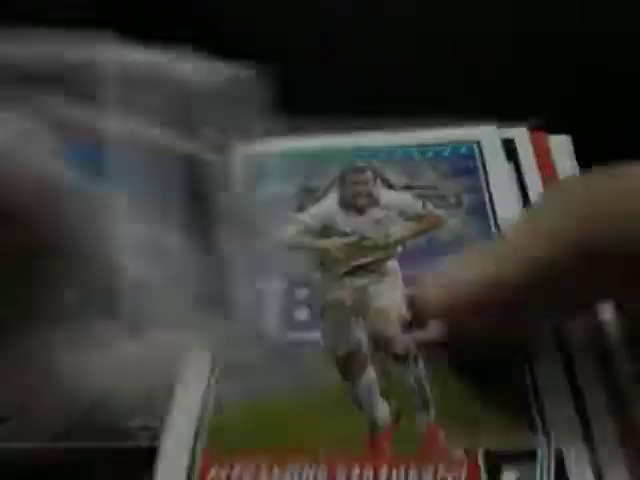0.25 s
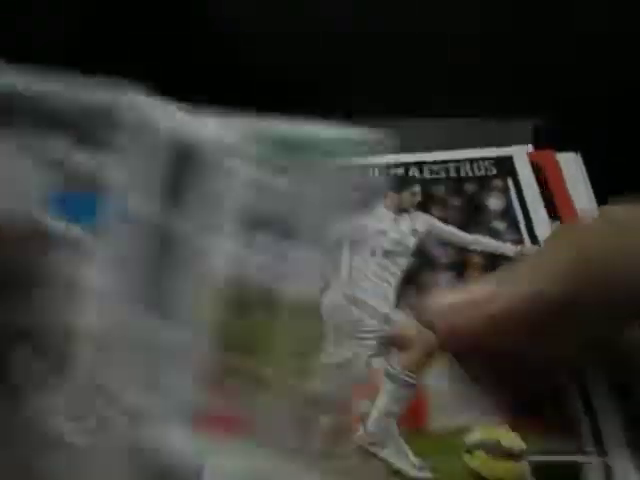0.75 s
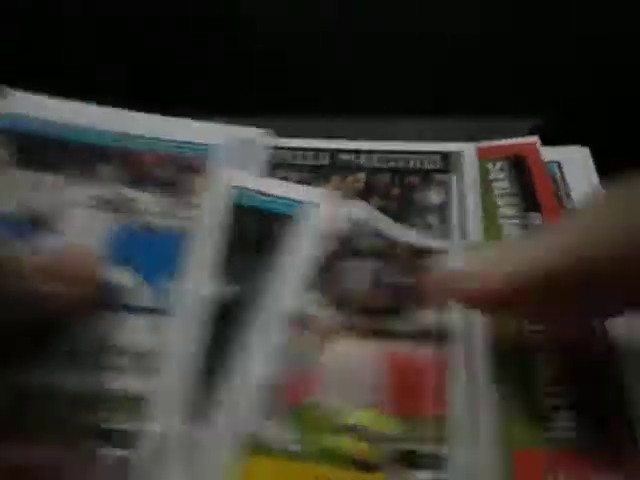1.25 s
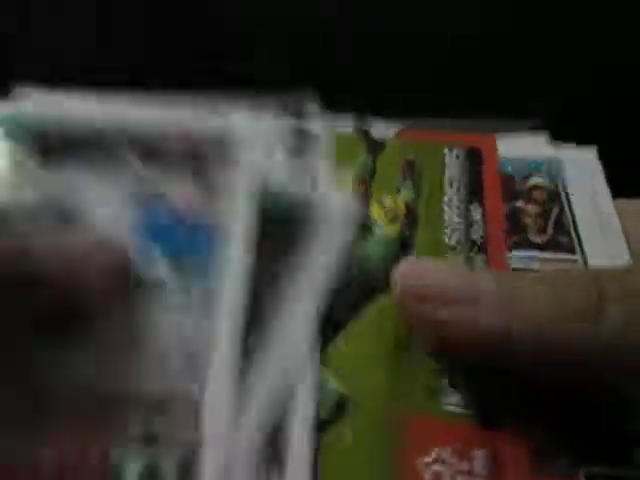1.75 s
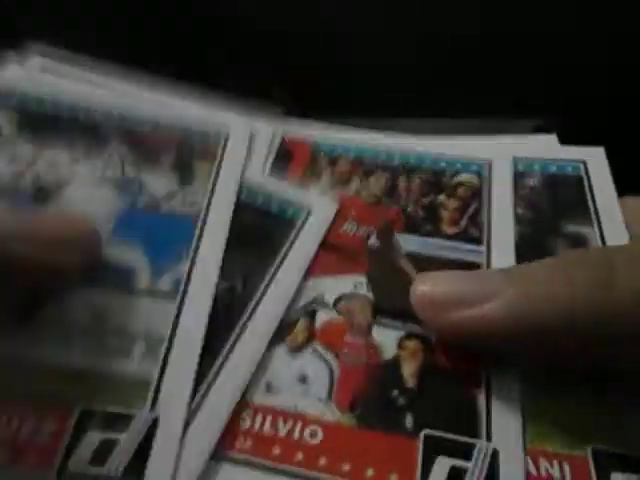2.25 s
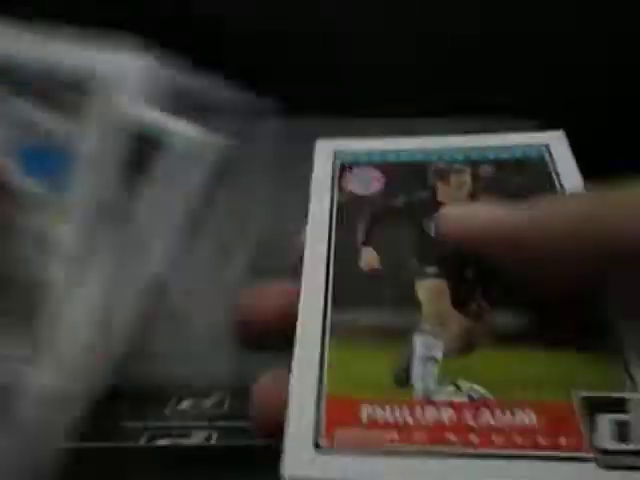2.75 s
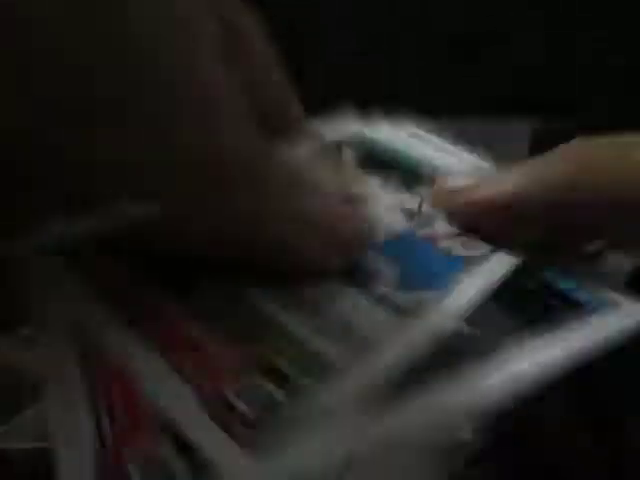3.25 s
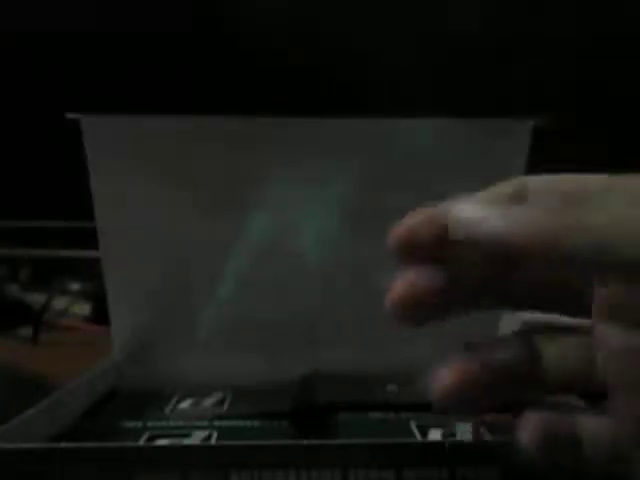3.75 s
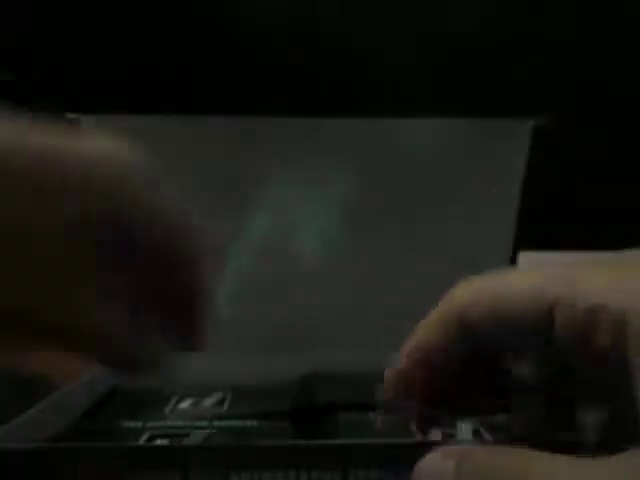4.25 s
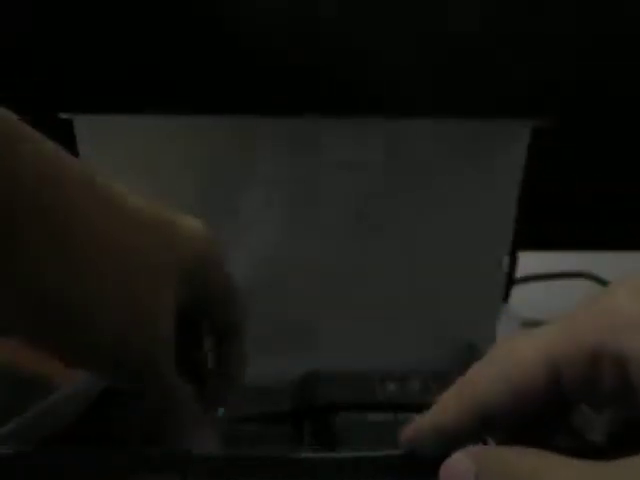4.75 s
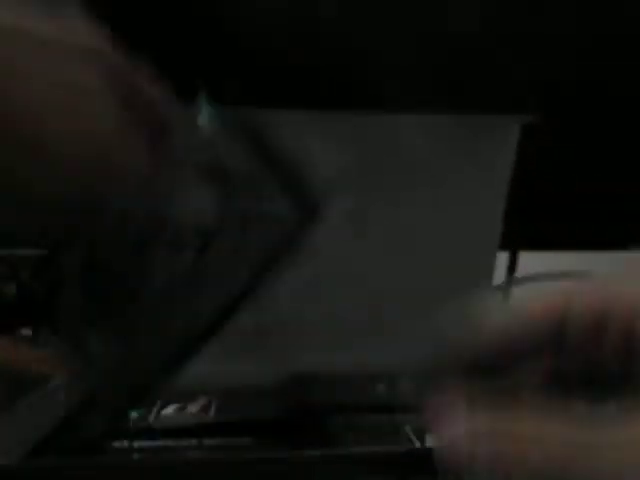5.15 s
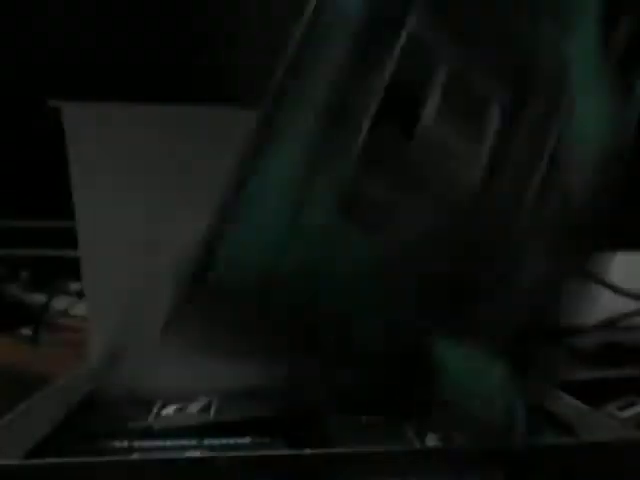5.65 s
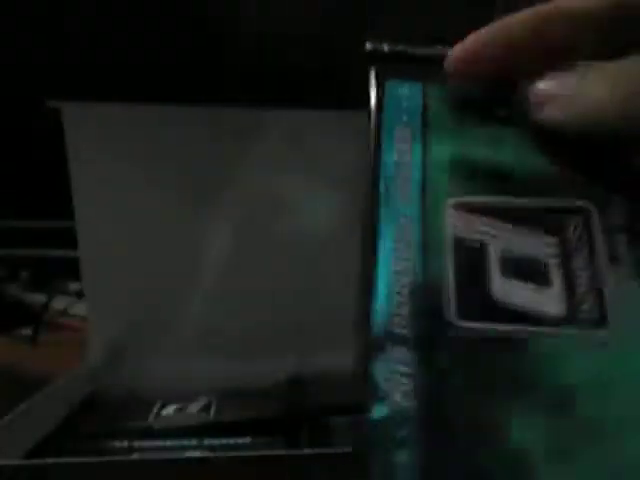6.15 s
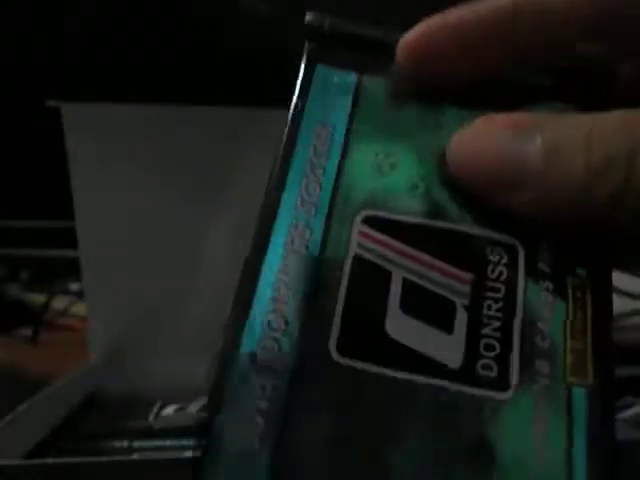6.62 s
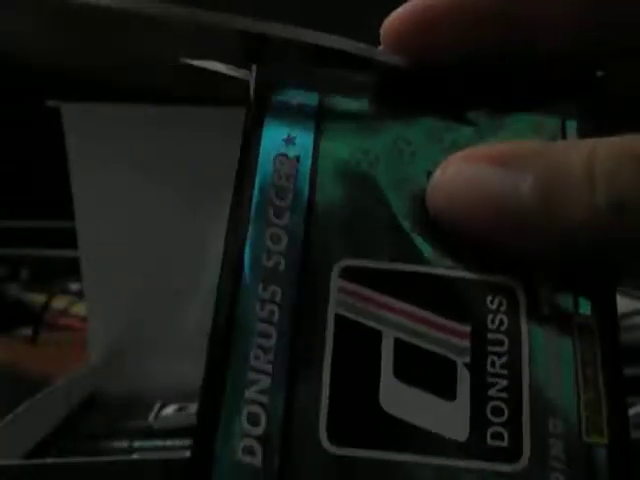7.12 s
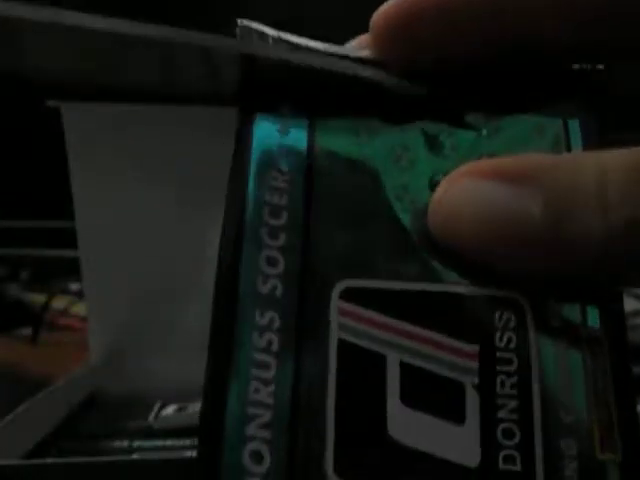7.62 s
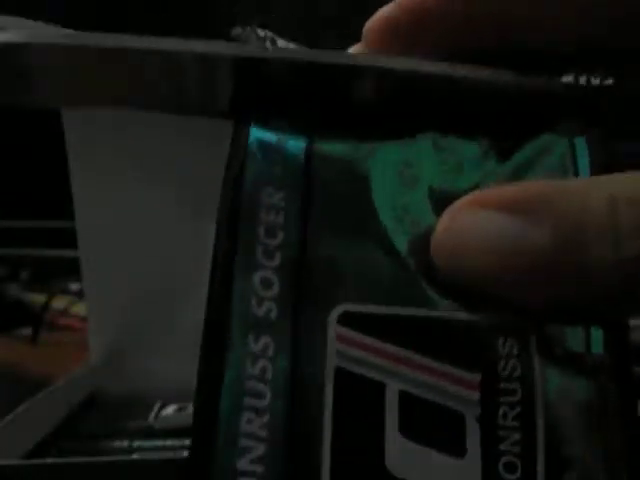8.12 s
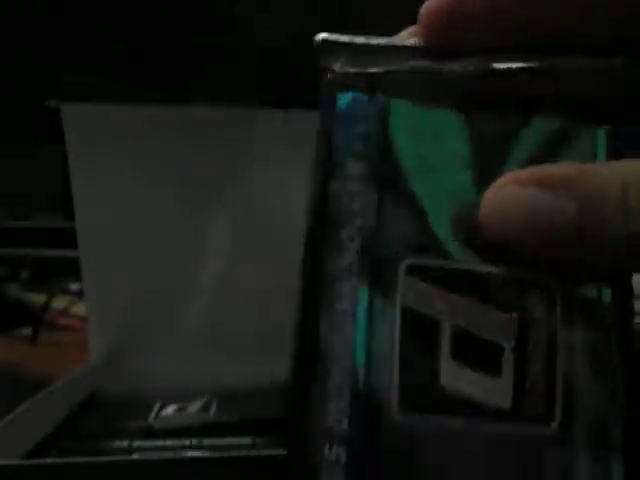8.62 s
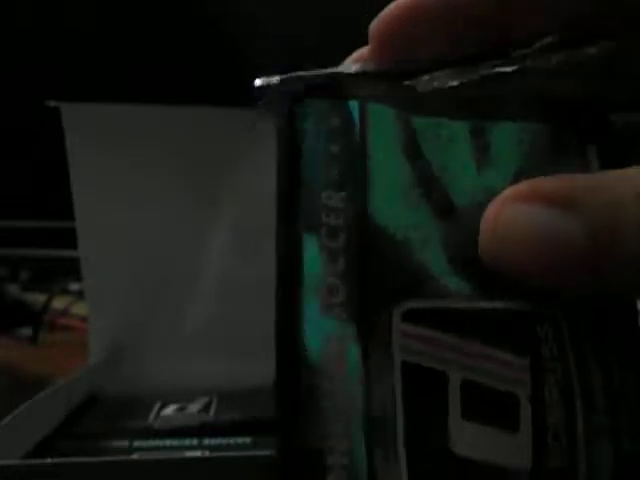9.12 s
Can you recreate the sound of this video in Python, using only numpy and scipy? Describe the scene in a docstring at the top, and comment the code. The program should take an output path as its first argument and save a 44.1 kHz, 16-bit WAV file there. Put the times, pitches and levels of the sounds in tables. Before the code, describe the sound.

Cards snap and rustle in the hands before a foil wrapper crinkles and rips, followed by a few hollow desk knocks in a quiet room.

```python
"""A desk in a quiet room, close to a small microphone, with a fan whirring steadily.
Trading cards are slid and flicked off a stack: friction makes them hiss, and each freed edge snaps.
A foil pack is scraped out of a cardboard box and torn open, crackling as its creases buckle.
A few hollow knocks set the damped modes of the desk ringing."""
import sys
import numpy as np
from scipy import signal
from scipy.io import wavfile
from scipy.ndimage import uniform_filter1d

SR = 44100
rng = np.random.default_rng(int(sys.argv[2]) if len(sys.argv) > 2 else 0)


def to_wav(sig):
    """Store sig (one row per channel, or 1-D mono) as 16-bit WAV at the path in sys.argv[1].

    Samples outside -1..1 are clipped; the rate is SR.
    """
    pcm = np.clip(np.atleast_2d(sig), -1, 1) * 32767
    pcm = np.round(pcm).astype(np.int16)
    wavfile.write(sys.argv[1], SR, pcm.T)  # frames by channels


N = 413658
TAPS = 4096
HZ = np.fft.rfftfreq(TAPS, 1 / SR) + 1
TIME = np.arange(N) / SR
CLICK_GAIN = np.sqrt(.005 * SR)  # brings a click of energy 1 to rms 1 over 5 ms

# Levels in all tables are relative: each source applies its own gains.
# Spectrum of fan and room air. Each row: frequency in Hz, spectral density in dB.
AIR_SPECTRUM = [(18, -47), (32, -12.5), (70, -10), (125, -0.5), (340, -1.5), (500, 1), (930, -5),
                (1460, -10), (2050, -11.5), (2600, -9), (3100, -12.5), (4300, -11.5), (5600, -20),
                (12000, -27)]
# Resonances of the fan's housing. Each row: frequency in Hz, width in Hz, lift in dB.
FAN_RESONANCES = [(1117, 54, 8.5), (2330, 260, 9), (6100, 64, 8.5)]
# Reverberation of the room. Each row: frequency in Hz, time to fall 60 dB in seconds.
ROOM_DECAY = [(150, 0.71), (1000, 0.24), (4000, 0.6), (10000, 0.45)]
# Treble response, falling in three lobes between deep notches. Each row: frequency in Hz, gain in dB.
TREBLE_RESPONSE = [(5700, 0), (6100, -3), (6600, -11), (6850, -20), (7000, -42), (7150, -18), (7600, -8),
                   (8100, -12), (8400, -21), (8520, -42), (8700, -18), (9300, -11), (9800, -18), (10000, -42),
                   (10200, -15), (10550, -6), (11100, -9), (11600, -17), (12000, -40)]

# Hollow resonances of the desk. Each row: frequency in Hz, level in dB, time to fall 60 dB in seconds.
DESK_MODES = [(109, -17, 0.61), (246.4, 1.5, 0.31), (300.6, -1.5, 0.27), (533, 5, 0.15), (609.4, -1, 0.14),
              (790, -0.5, 0.28), (1191, 3, 0.11), (1285, 9, 0.1), (1410, -1, 0.073), (1650, -17, 0.13),
              (1900, 4.5, 0.12), (2097, 3, 0.15), (2652, 8.5, 0.1), (2950, 4, 0.086), (3730, 2, 0.28)]
# Spectrum of a blow on the desk. Each row: frequency in Hz, level in dB.
BLOW_SPECTRUM = [(30, -53), (100, -4), (240, -3), (700, 1), (1400, 1), (2800, 3.5), (4200, 3.5),
                 (6000, -6.5), (12000, -4.5)]
# Knocks on the desk. Each row: start in seconds, blow in dB, treble cutoff in Hz, ringing in dB.
DESK_KNOCKS = [(5.926, -35, 710, -28.5), (5.937, -33, 1580, -35), (6.093, -57, 700, -38),
               (6.162, -42, 1300, -36.5), (9.0148, -21, 3770, -24), (9.042, -26, 3600, -26),
               (9.1085, -17.5, 3570, -19), (9.1618, -13.5, 3250, -13.5)]
# Things chattering on the desk. Each row: start, peak and end in seconds, level in dB, cutoff in Hz.
DESK_CHATTER = [(6.089, 6.14, 6.17, -51, 710), (6.146, 6.155, 6.195, -36, 1750),
                (9.167, 9.2, 9.245, -29, 3300)]
# Brief squeaks of foil or card, and two low creaks of the desk.
# Each row: peak and length in seconds, level in dB, pitch in Hz, rms waver of pitch in Hz.
SQUEAKS_AND_CREAKS = [(1, 0.037, -38, 3940, 320), (3.34, 0.014, -39, 3140, 200),
                      (3.745, 0.026, -38.5, 4800, 460), (4.841, 0.036, -41.5, 3300, 510),
                      (5.261, 0.04, -34.5, 904, 140), (5.64, 0.008, -18.5, 5630, 260),
                      (6.136, 0.11, -49, 237, 5.5), (6.171, 0.0429, -49, 551, 30),
                      (6.62, 0.032, -42, 2700, 98), (6.628, 0.04, -47, 3270, 90),
                      (6.722, 0.019, -25, 6000, 110)]
# Soft bumps of fingers and stack. Each row: start in seconds, level in dB, resonance in Hz.
FINGER_BUMPS = [(0.395, -31, 230), (1.236, -46, 160), (1.465, -35, 260), (2.068, -40.5, 218),
                (3.284, -43, 128), (4.018, -37, 215), (5.293, -36.5, 360), (5.618, -36, 317),
                (5.663, -36, 270), (5.929, -42, 129)]

# The pack dragged out of the box. Each row: time in seconds, hiss in dB, body of the box in dB.
PACK_DRAG = [(4.66, -58, -61), (4.73, -44, -51.5), (4.81, -67, -62), (4.84, -50.5, -49), (4.88, -53.5, -53),
             (4.96, -43, -43), (5.004, -23, -28), (5.05, -37, -36.5), (5.085, -46, -39.5),
             (5.115, -24.5, -34), (5.15, -33.5, -41), (5.18, -31, -38.5), (5.205, -46, -55),
             (5.22, -33.5, -40), (5.25, -44.5, -49), (5.331, -55, -60)]
# Hold of the fingers on the wrapper. Each row: time in seconds, firmness from 0 to 1.
WRAPPER_GRIP = [(4.5, 0.1), (4.9, 0.5), (5.8, 0.5), (6.1, 0.95), (6.4, 1.0), (6.85, 0.15), (7.4, 0.25),
                (8.5, 0.55), (8.8, 0)]
# Low body of foil in motion. Each row: frequency in Hz, level in dB.
FOIL_SPECTRUM = [(30, -30), (120, -17), (400, 0.5), (900, 2), (1300, 5.5), (2000, 4.5), (5000, -8),
                 (11000, -21)]
# Tugs that rub, peel and tear the foil. Each row: peak and length in seconds, hiss in dB, body in dB.
FOIL_TUGS = [(5.458, 0.064, -54.5, -39.5), (5.545, 0.079, -45, -66), (5.624, 0.1, -47.5, -49),
             (5.872, 0.05, -54, -59), (6.626, 0.04, -42.5, -64), (6.673, 0.032, -42.5, -68),
             (6.999, 0.1, -58, -62), (7.431, 0.16, -53, -71), (7.592, 0.15, -38.5, -40.5),
             (7.794, 0.15, -33.5, -46), (7.94, 0.073, -44, -46), (8.003, 0.06, -50.5, -67),
             (8.125, 0.2, -41.5, -55), (8.253, 0.1, -48, -48), (8.395, 0.078, -34, -42),
             (8.518, 0.16, -41, -42), (8.721, 0.048, -51.5, -62)]
# Creases buckling. Each row: time in seconds, snap in dB, snap resonance in Hz, body in dB.
FOIL_CREASES = [(5.379, -30, 3300, -40.5), (5.443, -39, 3210, -58), (5.487, -29.5, 3800, -55),
                (5.507, -34, 4400, -59), (5.5147, -18, 4200, -26), (5.586, -27.5, 4970, -40),
                (5.615, -24.5, 5400, -45), (5.639, -25, 5660, -34), (5.658, -23.5, 5200, -29.5),
                (5.772, -41, 2700, -53), (5.795, -29, 3350, -34), (5.831, -35.5, 4970, -57),
                (5.884, -36, 4160, -47), (5.928, -29.5, 3840, -32), (5.975, -37, 4080, -49),
                (6.017, -35, 3760, -47), (6.24, -25, 3300, -46), (6.262, -32.5, 3550, -60),
                (6.286, -34, 4070, -55), (6.3128, -18.5, 3450, -43), (6.351, -29, 3950, -58),
                (6.422, -43.5, 3890, -57), (6.52, -33.5, 3700, -58), (6.564, -33.5, 3430, -45),
                (6.591, -33, 4500, -42), (6.594, -26, 3650, -32), (6.617, -31, 8500, -55),
                (6.722, -34.5, 6050, -61), (6.985, -39.5, 3860, -41), (7.033, -38, 5470, -51),
                (7.09, -26, 4400, -39.5), (7.137, -41.5, 2730, -46), (7.274, -35.5, 3130, -35),
                (7.432, -31.5, 2500, -45), (7.469, -34.5, 4070, -36.5), (7.505, -23.5, 3370, -32),
                (7.547, -30.5, 3130, -44), (7.622, -29, 2940, -34.5), (7.688, -35, 3500, -48),
                (7.691, -25, 3480, -41), (7.75, -41, 2950, -29.5), (7.791, -24, 3895, -48),
                (7.903, -23, 3753, -30.5), (7.953, -23, 4800, -35), (8.066, -32.5, 3310, -45),
                (8.08, -28, 3960, -31.5), (8.131, -21, 4220, -33), (8.158, -22.5, 4180, -30),
                (8.399, -18.5, 3566, -25), (8.427, -24, 3740, -30.5), (8.447, -23, 3700, -31),
                (8.48, -21.5, 4110, -31)]

# Cavity of the hands and stack. Each row: frequency in Hz, width in Hz, lift in dB.
HAND_CAVITY = [(555, 180, 2), (940, 106, -8), (1284, 230, 2.5), (2010, 120, 5.5)]
# Low body of card in motion. Each row: frequency in Hz, level in dB.
CARD_SPECTRUM = [(30, -23), (100, -3.5), (220, 5.5), (700, 5), (1200, 2), (2000, -1), (5000, -56)]
# Strokes over card or box. Each row: peak and length in seconds, hiss in dB, body in dB.
CARD_SLIDES = [(0.996, 0.051, -41.5, -59), (3.165, 0.11, -42.5, -51), (3.333, 0.036, -39, -49),
               (3.396, 0.05, -51, -60), (3.514, 0.022, -44, -48.5), (3.594, 0.07, -36.5, -67),
               (4.001, 0.069, -47.5, -59), (4.504, 0.067, -44, -40), (4.583, 0.07, -41, -37),
               (4.642, 0.054, -40.5, -41.5)]
# Card edges striking stack, desk or box.
# Each row: start in seconds, snap in dB, snap resonance in Hz, flap of the sheet in dB.
CARD_FLICKS = [(0.728, -40.5, 2850, -40), (1.047, -39.5, 3660, -54), (1.202, -35, 2570, -45),
               (1.832, -34.5, 3260, -50), (1.938, -41.5, 2680, -37.5), (2.054, -33.5, 3620, -44),
               (2.755, -37.5, 3660, -43), (3.078, -36.5, 3630, -40), (3.1, -23, 3580, -26),
               (3.136, -36.5, 3160, -40), (3.279, -44.5, 3400, -45), (3.474, -41.5, 2850, -47),
               (3.74, -31.5, 2930, -40.5), (4.008, -40, 2990, -42), (4.017, -54, 2740, -37),
               (4.489, -29, 3300, -25), (4.581, -30, 2020, -29.5), (4.635, -24.5, 2900, -33),
               (4.784, -41.5, 3800, -50), (4.996, -24, 3030, -26), (5.021, -26, 4500, -26),
               (5.095, -27, 5340, -41), (5.14, -31, 3670, -30.5), (5.186, -23, 5640, -30),
               (5.263, -31.5, 2840, -35)]
# Cards drawn off the stack. Each row: touch in seconds, touch in dB, release in seconds, snap in dB,
# snap in Hz, flap in dB, flap in Hz, rebound in dB, pull in dB, length of the pull in seconds.
CARD_DRAWS = [(0.1438, -30, 0.3918, -22.5, 2800, -20, 470, -42, -39, 0.13),
              (0.7118, -39, 0.8898, -27, 3800, -31, 740, -31, -39.5, 0.08),
              (1.2228, -31, 1.4558, -19.5, 2500, -19.5, 785, -29, -43.5, 0.115),
              (1.8402, -28, 2.0062, -25, 4200, -35, 650, -38, -39, 0.055),
              (2.3518, -29.5, 2.4502, -27, 3080, -24, 560, -41, -35, 0.04),
              (2.7138, -37.5, 2.8358, -33, 4200, -38, 740, -48, -37, 0.06)]

SLIDE_HZ, RUB_HZ = 3670, 4050  # centre of the hiss of card and of foil


def amp(db):
    """Amplitude grows tenfold for every 20 dB."""
    return 10 ** (np.asarray(db) / 20)


def read(points, hz):
    """Interpolation of a table on a logarithmic frequency axis."""
    f, value = np.transpose(points)
    return np.interp(np.log(hz + 1), np.log(f), value)


def spectrum(points):
    """Amplitude response over HZ from a table of levels."""
    return amp(read(points, HZ))


def unit_rms(x):
    """Normalisation to a mean power of 1."""
    return x / np.sqrt(np.mean(x ** 2) + 1e-20)


def unit_energy(x):
    """Normalisation to a total energy of 1."""
    return x / np.sqrt(np.sum(x ** 2) + 1e-20)


def add(mix, start, sound):
    """Superposition: a sound joins the mix at its start in seconds."""
    part = mix[max(round(start * SR), 0):][:len(sound)]
    part += sound[:len(part)]


def colour(x, gain):
    """Minimum-phase filtering: a causal response with the given gain over HZ."""
    log_gain = np.log(np.maximum(gain, 1e-5))
    mirrored = np.concatenate([log_gain, log_gain[-2:0:-1]])
    response = np.exp(np.conj(signal.hilbert(mirrored)))
    return signal.fftconvolve(x, np.fft.ifft(response).real)


def lowpass(hz, order):
    """Gain that falls 6 dB per octave per order above the cutoff."""
    return 1 / np.hypot(1, (HZ / hz) ** order)


def highpass(hz, order):
    """Gain that falls 6 dB per octave per order below the cutoff."""
    return 1 / np.hypot(1, (hz / HZ) ** order)


def resonance(hz, q):
    """Response of a damped oscillator with quality factor q."""
    return 1 / np.hypot(1, q * (HZ / hz - hz / HZ))


def peaks(rows):
    """Gain of several resonant peaks or dips, each a Lorentzian curve in dB."""
    return amp(sum(db / (1 + (2 * (HZ - hz) / width) ** 2) for hz, width, db in rows))


def ripple(depth_db, spacing_hz):
    """The resonances of a sheet shift with every grip, giving a random ripple in gain."""
    knots = np.arange(0, SR, spacing_hz)
    return amp(depth_db * np.interp(HZ, knots, rng.standard_normal(TAPS)[:len(knots)]))


def noise():
    """White noise, long enough for any one stroke."""
    return rng.standard_normal(N // 16)


def unevenness(depth_db, every_s):
    """Random amplitude modulation, as a grip tightens and eases."""
    steps = noise()
    return amp(depth_db * np.interp(TIME, np.arange(len(steps)) * every_s, steps))


def burst(decay_s, scatter):
    """Impulsive excitation: a sudden release, then an exponentially dying scatter of contacts."""
    t = TIME[:TAPS // 2]
    push = scatter * unit_energy(rng.standard_normal(len(t)) * np.exp(-t / decay_s))
    push[0] += 1
    return push


def grains(count, per_s, spread_db):
    """Shot noise: independent slips of very unequal size."""
    chance, size, sign = rng.random((3, N))[:, :count]
    size_db = spread_db * np.minimum(-np.log(size + 1e-9), 4)
    return (chance < per_s / SR) * np.sign(sign - .5) * amp(size_db)


def span(peak, length, rise_share=0.42):
    """Start, peak and end of a stroke that speeds up faster than it slows."""
    return peak - rise_share * length, peak, peak + (1 - rise_share) * length


def swell(start, peak, end, ease=2):
    """Envelope of a stroke from rest to rest; less ease makes it fuller."""
    t = np.arange(start, max(end, start + .005), 1 / SR)
    return np.sin(np.pi / 2 * np.interp(t, [start, peak, end], [0, 1, 0])) ** ease


def fan(level_db=-53.5):
    """Steady broadband air noise is filtered by the resonances of the housing."""
    gain = spectrum(AIR_SPECTRUM) * peaks(FAN_RESONANCES)
    air = colour(rng.standard_normal(N + TAPS), gain)[TAPS:][:N]
    return amp(level_db) * unit_rms(air)


def room(x, tail_db, early_db):
    """Reverberation: early reflections from desk and box, then a faint diffuse tail."""
    n = SR // 2
    hz, t, bands = signal.stft(rng.standard_normal(n) * (TIME[:n] > .008), SR, nperseg=256)
    decay = amp(-60 * t / read(ROOM_DECAY, hz)[:, None])
    tail = signal.istft(bands * decay, SR, nperseg=256)[1][:n]
    early = np.zeros(n)
    early[(SR * rng.uniform(.002, .016, size=10)).astype(int)] = rng.standard_normal(size=10)
    response = amp(tail_db) * unit_energy(tail) + amp(early_db) * unit_energy(early)
    return x + signal.fftconvolve(x, response)[:N]


def panel_mode(hz, t, spread=0.0232):
    """Mode splitting: a loose panel turns one resonance into four close partials that beat."""
    detune, phase = rng.uniform(-1, 1, (2, 4, 1))
    partials = np.sin(2 * np.pi * (hz * (1 + spread * detune) * t + phase))
    return unit_rms(partials.sum(0))


def desk_ring(modes_db=1.5, wash_t60_s=0.44, rise_s=0.0048):
    """Free vibration of the desk: distinct modes and a dense wash decay exponentially."""
    t = TIME[:SR // 2]
    modes = sum(amp(db - 60 * t / t60) * panel_mode(hz, t) for hz, db, t60 in DESK_MODES)
    wash = rng.standard_normal(len(t)) * amp(-60 * t / wash_t60_s)
    wash = colour(wash, spectrum(BLOW_SPECTRUM) * lowpass(5000, 1))[:len(t)]
    return (amp(modes_db) * unit_energy(modes) + unit_energy(wash)) * (1 - np.exp(-t / rise_s))


def knocks(ring):
    """Impact excitation: a short blow sets the desk ringing; softer blows carry less treble."""
    out = np.zeros(N)
    for start, blow_db, cutoff_hz, ring_db in DESK_KNOCKS:
        softness = lowpass(cutoff_hz, 0.95)
        force = burst(decay_s=0.0037, scatter=2.5)
        blow = colour(force, softness * spectrum(BLOW_SPECTRUM) * ripple(depth_db=0.5, spacing_hz=161.5))
        add(out, start, amp(blow_db) * unit_energy(blow))
        add(out, start, amp(ring_db) * unit_energy(colour(ring, softness)))
    return CLICK_GAIN * out


def chatter(ring, decay_s=0.01):
    """Forced vibration: rapid contacts of things on the desk drive its heavily damped modes."""
    out = np.zeros(N)
    damped_ring = ring * np.exp(-TIME[:len(ring)] / decay_s)
    for start, peak, end, db, cutoff_hz in DESK_CHATTER:
        force = swell(start, peak, end)
        contacts = force * noise()[:len(force)]
        rattle = colour(signal.fftconvolve(contacts, damped_ring), lowpass(cutoff_hz, 2))
        add(out, start, amp(db) * np.linalg.norm(force) * unit_energy(rattle))
    return out


def desk():
    """Radiation from a finite panel: the desk top is too small to give out the deepest bass."""
    ring = desk_ring()
    return colour(knocks(ring) + chatter(ring), highpass(65, 3))[:N]


def squeaks_and_creaks():
    """Brief unsteady tones: foil or card squeaks by stick-slip, and resonances of the desk creak."""
    out = np.zeros(N)
    for peak, length, db, hz, waver_hz in SQUEAKS_AND_CREAKS:
        start, peak, end = span(peak, length)
        force = swell(start, peak, end)
        waver = unit_rms(uniform_filter1d(noise(), size=60))[:len(force)]
        phase = 2 * np.pi * np.cumsum(hz + waver_hz * waver) / SR
        add(out, start, amp(db) * np.sqrt(2) * force * np.sin(phase))
    return out


def bumps():
    """Heavily damped impact: flesh meeting card gives a dull push with no ring."""
    out = np.zeros(N)
    for start, db, hz in FINGER_BUMPS:
        thud = colour(burst(decay_s=0.0062, scatter=0.93), resonance(hz, q=1.3) * lowpass(600, 2))
        add(out, start, amp(db) * unit_energy(thud))
    return CLICK_GAIN * out


def hiss_gain(hz, q, fizz):
    """Spectrum of sliding friction: a broad resonance over a floor of fizz, with little bass."""
    return np.hypot(resonance(hz, q), fizz) * highpass(1700, 2)


def friction(strokes, body_spectrum, hiss_db, body_db, q, fizz, ease,
             slips_per_s, spread_db, smooth, clump_db):
    """Sliding friction: clumps of tiny slips drive a sheet's resonances in step with hand speed."""
    out = np.zeros(N)
    for start, peak, end, hiss, hiss_hz, body in strokes:
        speed = swell(start, peak, end, ease)
        n = len(speed)
        slips = unit_rms(grains(n, slips_per_s, spread_db)) + smooth * noise()[:n]
        clumps = amp(clump_db * unit_rms(uniform_filter1d(noise(), size=200))[:n])
        surface = amp(hiss + hiss_db) * unit_energy(hiss_gain(hiss_hz, q, fizz))
        sheet = amp(body + body_db) * unit_energy(spectrum(body_spectrum))
        gain = np.hypot(surface, sheet) * ripple(depth_db=2.5, spacing_hz=224)
        stroke = unit_energy(colour(slips * clumps * speed, gain))
        add(out, start, np.linalg.norm(gain) * np.linalg.norm(speed) * stroke)
    return out


def pack_drag(catch_gain=0.96, smooth=0.38):
    """Stick-slip friction: fine slips and coarser catches drive both the foil and the cardboard box."""
    times, hiss_db, body_db = np.transpose(PACK_DRAG)
    catches = grains(N, per_s=110, spread_db=3.5)
    catches = signal.fftconvolve(catches, burst(decay_s=0.0018, scatter=1.2))[:N]
    slips = grains(N, per_s=2200, spread_db=5)
    force = unit_rms(slips) + catch_gain * unit_rms(catches) + smooth * rng.standard_normal(N)
    force *= unevenness(depth_db=1.4, every_s=0.006)
    surface = hiss_gain(3900, q=1, fizz=0.12)
    box = spectrum(CARD_SPECTRUM) * highpass(220, 1)
    out = np.zeros(N)
    for gain, db in [(surface, hiss_db), (box, body_db - 1)]:
        envelope = amp(np.interp(TIME, times, db, left=-np.inf, right=-np.inf))
        out += envelope * unit_rms(colour(force, gain)[:N])
    return out


def crinkle(ticks_db=-59, ticks_per_s=60, brush_db=-56.5):
    """Shot noise from the wrapper: faint ticks and brushing in proportion to the grip."""
    grip = np.interp(TIME, *np.transpose(WRAPPER_GRIP))
    ticks = sum(colour(grains(N, ticks_per_s / 4, spread_db=3.5), resonance(hz, q=3.5))[:N]
                for hz in np.geomspace(2900, 5200, num=4))
    brush = colour(grains(N, per_s=2500, spread_db=4), resonance(9800, q=0.76))[:N]
    brush *= unevenness(depth_db=2, every_s=0.05)
    return grip * (amp(ticks_db) * unit_rms(ticks) + amp(brush_db) * unit_rms(brush))


def creases(snaps, body_db=-2, creep_db=-12, creep_rise_s=0.00061):
    """Snap-through buckling: a facet of foil creeps, pops over and rings for a few cycles."""
    out = np.zeros(N)
    lead = SR // 200  # 5 ms of creep before the pop
    for when, snap, snap_hz, body in snaps:
        facet = amp(snap) * unit_energy(resonance(snap_hz, q=2.23) * highpass(2200, 3))
        pack = amp(body + body_db) * unit_energy(spectrum(FOIL_SPECTRUM))
        gain = np.hypot(facet, pack) * ripple(depth_db=1.7, spacing_hz=615)
        creep = unit_energy(rng.standard_normal(lead) * np.exp(TIME[:lead] / creep_rise_s))
        push = np.concatenate([amp(creep_db) * creep, burst(decay_s=0.0015, scatter=1)])
        add(out, when - lead / SR, np.linalg.norm(gain) * unit_energy(colour(push, gain)))
    return CLICK_GAIN * out


def foil_events(creases_per_s=67, lift_db=0.5, spread_db=2.5, body_db=-10, pitch_spread=0.45):
    """Buckling under load: each tug rubs the foil, and small creases cluster round its peak."""
    snaps, strokes = list(FOIL_CREASES), []
    for peak, length, hiss, body in FOIL_TUGS:
        strokes.append((*span(peak, length), hiss, RUB_HZ, body))
        for offset, size, pitch in rng.standard_normal((16, 3))[:round(creases_per_s * length)]:
            db = hiss + lift_db + spread_db * size
            hz = RUB_HZ * np.exp(pitch_spread * pitch)
            snaps.append((peak + offset * length / 5, db, hz, db + body_db))
    return snaps, strokes


def flicks(snaps, flap_db=-1):
    """Elastic release: a card's edge snaps and its sheet flaps, filtered by the cavity of the hands."""
    out = np.zeros(N)
    for start, snap, snap_hz, flap, flap_hz in snaps:
        edge_gain = resonance(snap_hz, q=2.3) * ripple(depth_db=3.1, spacing_hz=360.6)
        edge = colour(burst(decay_s=0.002, scatter=1.63), edge_gain * highpass(1200, 2))
        sheet_gain = resonance(flap_hz, q=2.5) * ripple(depth_db=0.3, spacing_hz=166) * lowpass(1700, 2)
        sheet_gain *= highpass(70, 1)  # a small sheet radiates little bass
        sheet = colour(burst(decay_s=0.0032, scatter=0.83), sheet_gain + 0.19 * spectrum(CARD_SPECTRUM))
        add(out, start, amp(snap) * unit_energy(edge) + amp(flap + flap_db) * unit_energy(sheet))
    return colour(CLICK_GAIN * out, peaks(HAND_CAVITY))[:N]


def skid(start, snap_db, rise_s=0.0037, length_s=0.064, hiss_db=-17, body_db=-18.5):
    """Friction brings a landed card to rest in one short stroke, softer than its snap."""
    return start, start + rise_s, start + length_s, snap_db + hiss_db, SLIDE_HZ, snap_db + body_db


def card_events(edge_hz=3340, flap_hz=770, rebound_hz=337, rebound_s=0.0125,
                pull_rise_share=0.66, run_out_s=0.012, pull_body_db=-11, settle_db=-9):
    """Impact and friction alternate: a card is touched, pulled, snaps free, rebounds and settles."""
    snaps = [(start, db, hz, flap_db, flap_hz) for start, db, hz, flap_db in CARD_FLICKS]
    strokes = [(*span(peak, length), hiss, SLIDE_HZ, body) for peak, length, hiss, body in CARD_SLIDES]
    strokes += [skid(start, db + settle_db) for start, db, _, _ in CARD_FLICKS]
    for touch, touch_db, release, *snap_and_flap, rebound_db, pull_db, pull_s in CARD_DRAWS:
        start, rebound = release - pull_s, release + rebound_s
        snaps += [(touch, touch_db, edge_hz, touch_db - 1, flap_hz),
                  (release, *snap_and_flap),
                  (rebound, rebound_db, SLIDE_HZ, rebound_db - 3, rebound_hz)]
        peak = start + pull_rise_share * pull_s
        pull = (start, peak, release + run_out_s, pull_db, SLIDE_HZ, pull_db + pull_body_db)
        strokes += [skid(touch, touch_db), pull, skid(rebound, rebound_db)]
    return snaps, strokes


def scene():
    """Superposition of cards, foil, squeaks and creaks in the room with the desk and the fan."""
    card_snaps, card_strokes = card_events()
    foil_snaps, foil_strokes = foil_events()
    slides = friction(card_strokes, CARD_SPECTRUM, hiss_db=0.5, body_db=-2, q=1.8, fizz=0.36, ease=1.1,
                      slips_per_s=2200, spread_db=4, smooth=0.69, clump_db=3)
    rubs = friction(foil_strokes, FOIL_SPECTRUM, hiss_db=4, body_db=-5.5, q=0.6, fizz=0.18, ease=0.84,
                    slips_per_s=1800, spread_db=3, smooth=0.39, clump_db=5)
    cards = room(flicks(card_snaps) + slides + pack_drag() + bumps(), tail_db=-18, early_db=-20)
    foil = room(creases(foil_snaps) + crinkle() + rubs, tail_db=-21.5, early_db=-19)
    brief_tones = room(squeaks_and_creaks(), tail_db=-20, early_db=-17)
    return (cards + foil + brief_tones + desk() + fan())[None]


def record(dry):
    """Linear filtering: the treble falls away in three lobes between deep notches, and a low-pass limits the
    band."""
    heard = colour(dry[0], spectrum(TREBLE_RESPONSE))[:N]
    band_limit = signal.firwin(255, cutoff=12400, window=("kaiser", 9), fs=SR)
    return signal.oaconvolve(heard, band_limit, "same")[None]


dry = scene()
out = record(dry)
to_wav(out)
```